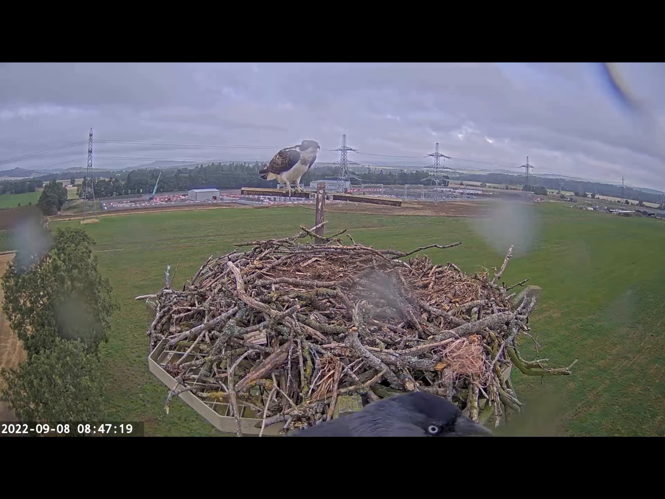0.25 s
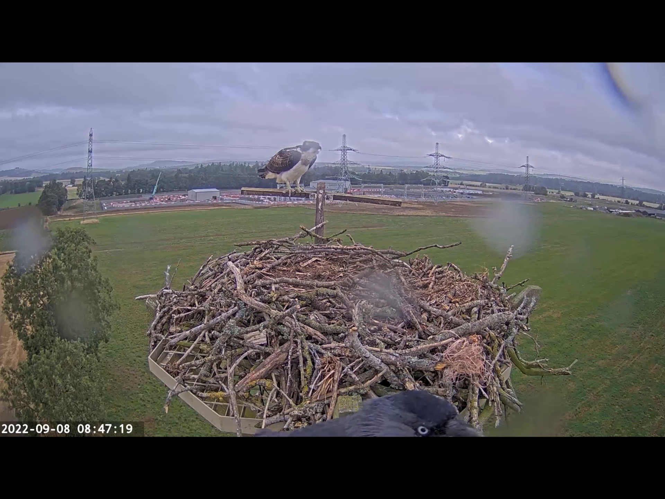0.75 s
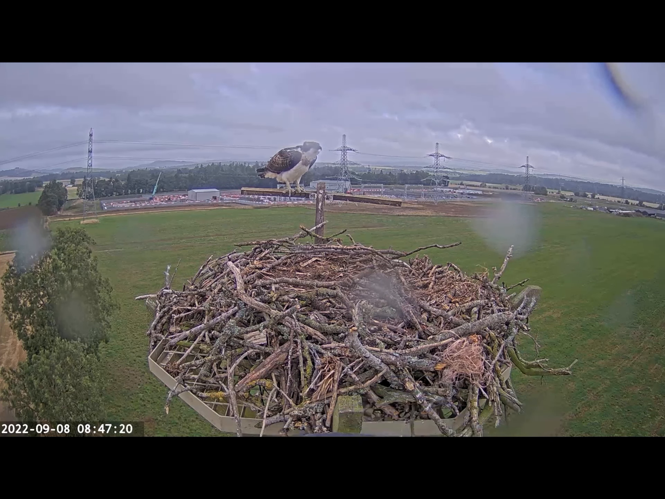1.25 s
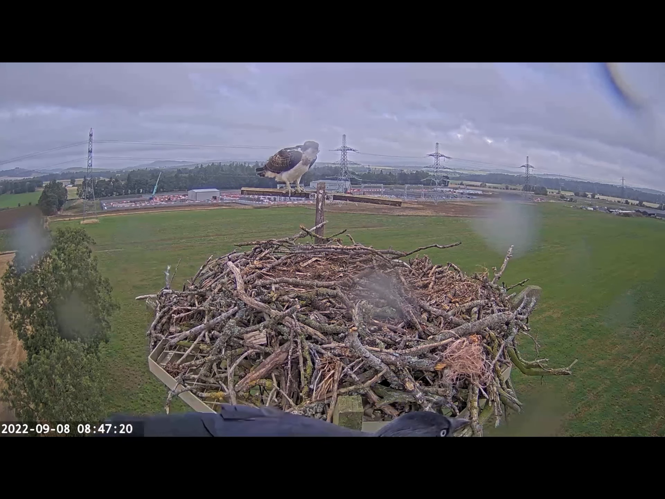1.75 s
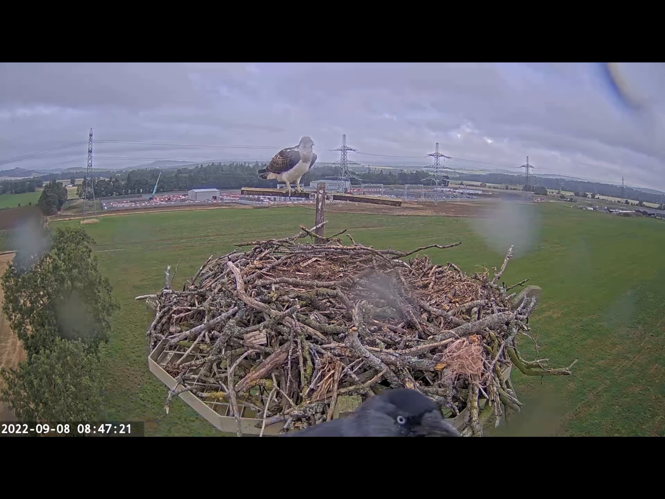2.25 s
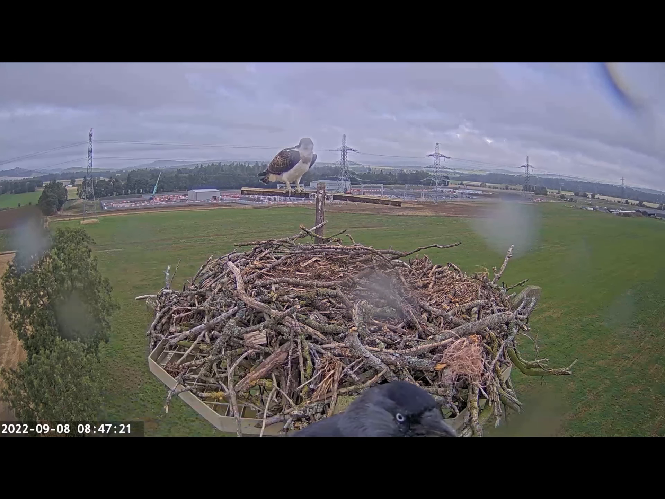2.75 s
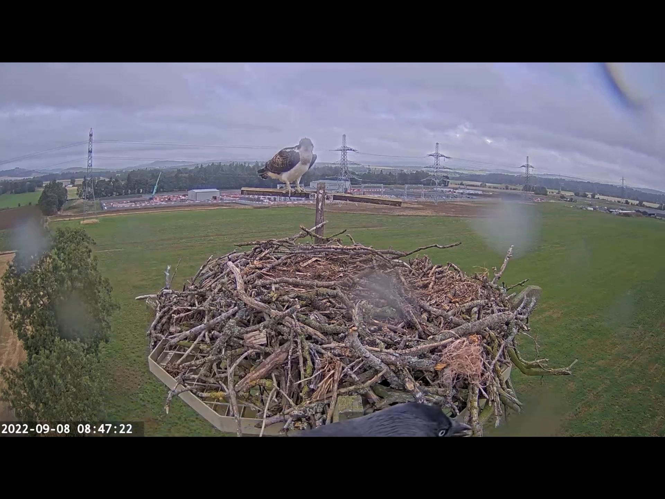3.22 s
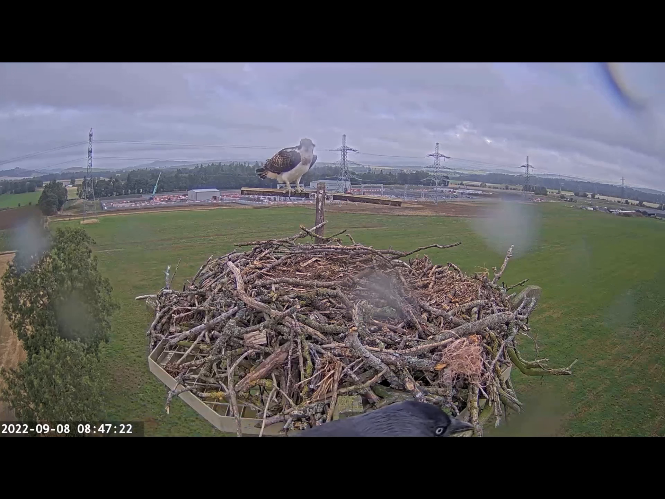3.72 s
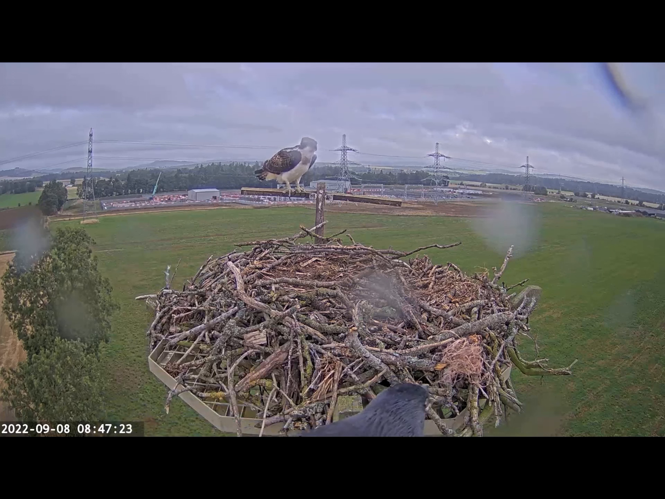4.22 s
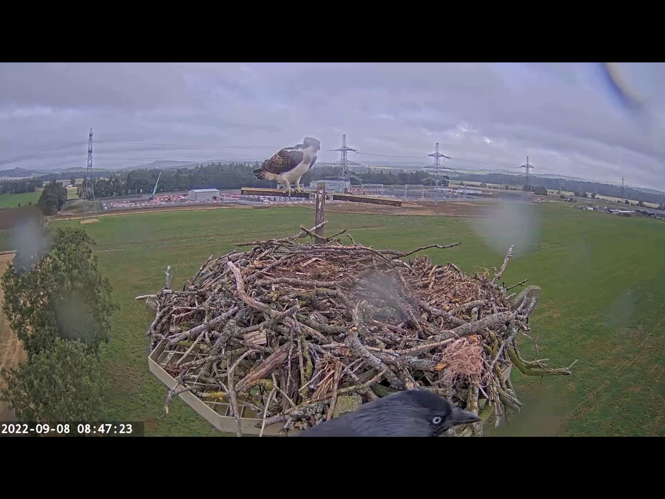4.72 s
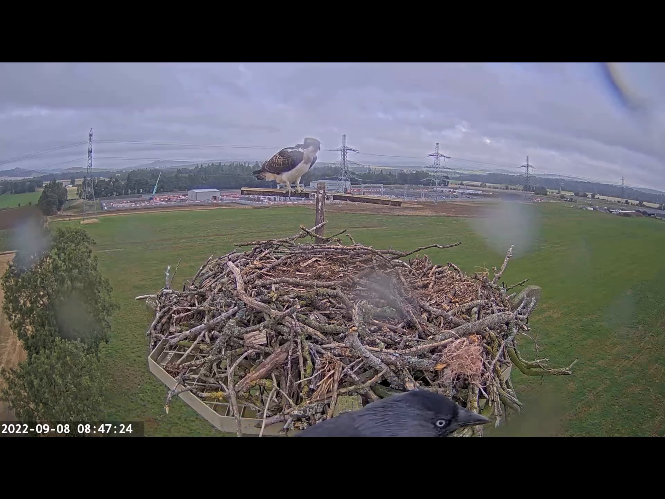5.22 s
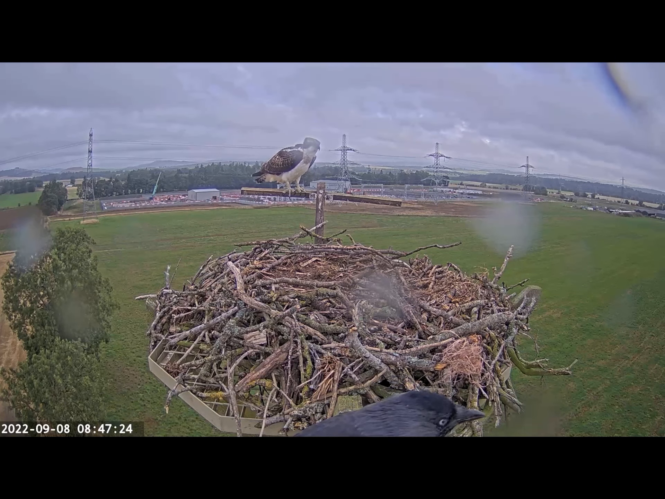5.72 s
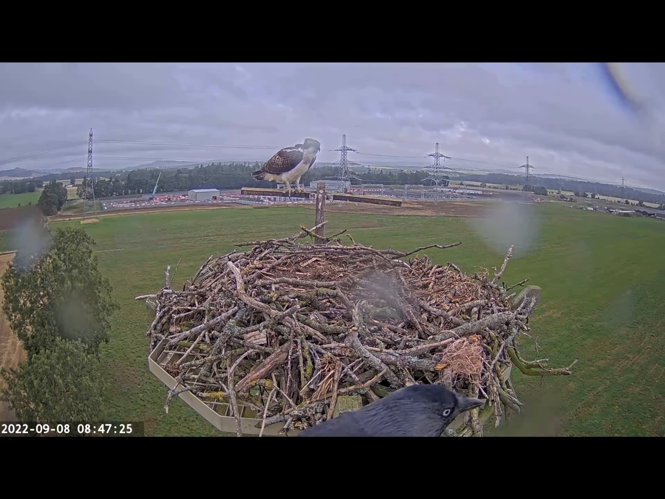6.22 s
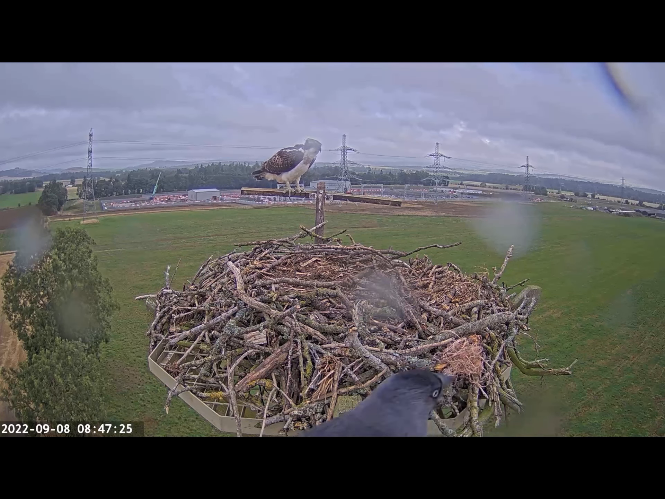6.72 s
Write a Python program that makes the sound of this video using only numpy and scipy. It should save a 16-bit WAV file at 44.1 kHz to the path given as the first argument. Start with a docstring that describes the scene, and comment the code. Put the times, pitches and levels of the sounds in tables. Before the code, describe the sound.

Wind pushes on a microphone at an exposed stick nest for about seven seconds: deep uneven buffeting, low rumble and a soft, slightly hollow rushing hiss. In the first 0.7 seconds faint claw clicks and dull knocks tick on the sticks. At about 0.95 a jackdaw very close by gives a sharp, bright, falling chack, followed at 1.1 by a softer, nasal, clipped kya. Two faint knocks come around 1.3. At 1.7 there is one quick wingbeat, a short airy swish with a tiny whip and a trailing feather rustle. A second double call comes at 3.1 and 3.25 as a gust swells. From 3.8 to 6.5 small claw ticks scatter irregularly over wood. The third chack, brightest and harshest, lands at 6.67, then a faint thin squeak at 6.8 and a quiet final kya at 6.9. Each note has only a brief scattered tail.

```python
"""A jackdaw on a high platform gives three double calls: a sharp "tchak", then a soft "kya"; one squeak is added.
Each note is a harmonic stack through throat and beak, with breath noise and usually a second voice.
It flaps up once (swept noise, feather hiss, a whip) and its claws tick on sticks (decaying noise bursts).
Wind, as shaped noise, buffets the microphone of a nest camera, rumbles, and hisses in the housing."""
import sys
import numpy as np
from scipy import signal
from scipy.fft import rfft, irfft
from scipy.io import wavfile
from scipy.ndimage import uniform_filter1d

SR = 44100
rng = np.random.default_rng(int(sys.argv[2]) if len(sys.argv) > 2 else 0)


def put_to_file(sound):
    """Save the sound as 16-bit audio at rate SR, in the file named by the first command-line argument."""
    columns = np.atleast_2d(sound).T  # one column per channel
    safe = np.clip(columns, -1, 1)
    whole_steps = np.round(safe * 32767)
    wavfile.write(sys.argv[1], SR, whole_steps.astype(np.int16))


N = 307136
T = np.arange(N) / SR

# sharp first notes: (time [s], length before release [s], pitch [Hz], final pitch [Hz], glide [s], body [dB],
# edge [dB], edge attack [s], time to the break [s], second voice [Hz], second voice [dB],
# edge tilt [dB/octave], lower beak gap [Hz], upper beak gap [Hz])
TCHAKS = [(0.955, 0.057, 1082, 852, 0.039, -19, -33.5, 0.011, 0.046, 1996, -29, -5.5, 3320, 8500),
          (3.098, 0.054, 1151, 824, 0.035, -20, -31, 0.0094, 0.038, 2320, -37, -5, 2750, 8000),
          (6.666, 0.059, 1208, 780, .040, -19.5, -26, 0.0074, 0.054, 2334, -33, -1.5, 4150, 8630)]
# soft second notes: (time [s], length before release [s], pitch [Hz], scoop [s], hold [s], opening push [dB],
# sag [dB/s], body [dB], edge [dB], edge tilt [dB/octave], lift of the fundamental [dB],
# extra throat ring [dB], second voice in the hold [Hz], [dB], second voice at the end [Hz], [dB])
KYAS = [(1.0864, 0.047, 773.4, 0.0044, .035, -0.5, 134, -24.5, -50, 2, 3, 6, 2250, -39, 2304, -34.5),
        (3.2553, 0.044, 843.5, 0.017, 0.034, -2.5, 56, -30.5, -51.5, 0.5, 0.5, -4, 2623, -47, 2247, -29.5),
        (6.896, 0.023, 774, 0.0038, 0.018, 3.5, 73, -32.5, -55.5, -2, 6, 3.5, 2197, -48, 2020, -37)]
# throat response, beak wide open: (frequency [Hz], gain [dB])
OPEN_THROAT = [(600, -2.5), (950, -0.5), (1150, 1), (1500, -12), (1950, 1.5), (2200, 5.5), (2400, 3),
               (2900, -21), (3450, -16), (4200, -14.5), (5200, -15.5), (6100, -20.5), (6900, -15),
               (7700, -18.5), (9200, -28.5)]
# throat response, beak half closed: (frequency [Hz], gain [dB])
NARROW_THROAT = [(550, -9.5), (800, -6.5), (1200, -8), (1600, -5.5), (1950, -8), (2320, 2), (2530, -7.5),
                 (3050, -22), (3400, -28.5), (3800, -32.5), (4400, -48), (5300, -30), (6200, -43.5),
                 (6900, -26), (7600, -38), (8300, -51)]
# beak gap of the squeak: (frequency [Hz], width [Hz])
SQUEAK_GAPS = [(4550, 1300)]
# wingbeat, then settling feathers: (time [s], level [dB], treble relative to sweep [dB])
WING = [(1.712, -85, 0), (1.720, -66, -4), (1.727, -54, -7), (1.743, -51, -10), (1.752, -64, 3),
        (1.768, -66, 11), (1.782, -68, 10), (1.793, -65, 15), (1.803, -74, 10), (1.845, -73, 8),
        (1.857, -71, 9), (1.868, -68, 2), (1.895, -82, 4)]
# hiss of the feather groups: (frequency [Hz], width [Hz], relative level [dB])
FEATHERS = [(4300, 1200, -9), (5700, 1400, -1), (7000, 1400, 0.5), (8300, 2200, -2)]
# claws on the sticks: (time [s], click [dB], knock [dB])
CLAWS = [(0.028, -62, -53), (0.166, -76, -49), (0.314, -76, -54), (0.401, -72, -51), (0.434, -74, -61),
         (0.477, -74, -54), (0.630, -70, -57), (0.693, -74, -60), (1.259, -82, -56), (1.338, -74, -55),
         (3.828, -67, -59), (3.93, -70, -51.5), (4.158, -61, -51.5), (4.282, -64.5, -54), (4.303, -71, -52),
         (4.731, -63, -51.5), (4.751, -71, -55), (4.911, -63, -53), (5.371, -72, -58), (5.783, -67, -53.5),
         (5.856, -70, -51), (5.877, -68, -56), (5.927, -70, -53), (6.035, -67.5, -55), (6.087, -67, -56),
         (6.196, -78, -53), (6.498, -80, -58)]
# stick resonances: (frequency [Hz], width [Hz], relative gain [dB])
STICK = [(1150, 600, 3), (2120, 490, -1), (2840, 350, -4.5), (3370, 370, -11.5)]
# wind strength: (time [s], buffeting above 20 Hz [dB], rumble [dB], rush [dB])
WIND = [(0.0, -28, -35, -38), (0.27, -27, -34.5, -39.5), (0.36, -27.5, -33.5, -42),
        (0.44, -27.5, -38, -37.5), (0.6, -36, -37, -41), (0.93, -27, -39, -44.5), (1.15, -38.5, -42, -40.5),
        (1.45, -27, -35, -39.5), (1.58, -32.5, -38.5, -41), (1.9, -34.5, -45.5, -42), (2.12, -34, -42, -49),
        (2.27, -36.5, -37.5, -46.5), (2.5, -32, -36, -43), (2.78, -31, -33, -41), (2.92, -31, -34, -46.5),
        (3.08, -36.5, -38, -46), (3.27, -26, -33.5, -42.5), (3.5, -27, -32.5, -40), (3.68, -30, -35, -41),
        (4.05, -34, -33, -39), (5.0, -32, -34, -41), (6.3, -33, -37, -41.5), (6.46, -36, -39.5, -43.5),
        (6.56, -31.5, -39, -40.5), (6.96, -35, -36.5, -45)]
# buffeting spectrum: (frequency [Hz], relative density [dB per Hz])
BUFFET = [(4, 5), (10, 11), (18, 7), (30, -2), (48, -4), (70, -27.5), (300, -100)]
# rumble spectrum: (frequency [Hz], relative density [dB per Hz])
RUMBLE = [(10, -25), (40, -7), (58, 1), (80, -1.5), (115, -8), (170, -18), (300, -41), (900, -91)]
# rush spectrum: (frequency [Hz], relative density [dB per Hz])
RUSH = [(70, 0), (160, 1.5), (250, -2), (400, -7), (700, -14), (1050, -16), (1350, -23.5), (1600, -31.5),
        (2100, -33.5), (2550, -39), (4500, -65), (9500, -65.5)]
# air resonances of the housing: (frequency [Hz], width [Hz], relative peak density [dB per Hz])
HOUSING = [(2087, 554, -2.5), (2750, 240, -7.5), (3230, 450, -21), (3556, 260, -15.5), (4170, 300, -16),
           (5150, 500, -19.5), (6120, 560, -23.5), (7220, 1500, -28.5)]
# narrow quiet bands in the wind hiss: (frequency [Hz], width [Hz])
WIND_HISS_GAPS = [(2530, 170), (3880, 240), (4580, 340), (5500, 100)]
# resonances of the port before the microphone: (frequency [Hz], width [Hz], gain [dB])
PORT = [(3180, 320, -11), (3620, 230, -0.5), (3990, 360, -3.5), (4400, 200, -6.5), (5240, 340, 2),
        (5980, 430, 1), (6830, 320, 0), (7560, 600, -2.5), (8820, 530, -6)]
# bands where the port's paths cancel: (frequency [Hz], width [Hz])
PORT_GAPS = [(4720, 91), (6320, 180)]

# all notes
EDGE_HZ, TOP_HZ = 2800, 9500
EDGE_BREATH_POWER = (.012, .2)  # breath share of the edge: clear, full rasp
SECOND_JITTER_RATIO = 3  # pitch spread of the second voice over the note's jitter setting
EDGE_WET_DB = -4.5  # the sticks return much of the treble
RING_OUT_S = 0.022

# tchak; jitter is a pitch share, later scaled by 0.33 + rasp
TCHAK_SWELL_DB, TCHAK_SLACK_DB = 4, -12.5
TCHAK_SLACK_S, TCHAK_SLACKEN_S = 0.028, 0.026  # start and duration of the slackening
TCHAK_BREAKING_S, TCHAK_SECOND_S = 0.009, 0.0091
TCHAK_RASP = (.14, .55)  # before, after the break
TCHAK_DULL_DB_PER_OCT, TCHAK_BRIGHTEN_S = -7.5, 0.024
TCHAK_JITTER, TCHAK_UNEVEN_DB = .008, 4.5
EDGE_LEAD_S = 0.0089  # the edge releases this long before the body
BEAK_GAP_WIDTH_HZ = 710

# kya
KYA_RASP = (.5, .18, .45)  # start, hold, end
KYA_CLEAR_S, KYA_BREAKING_S, KYA_PUSH_S = 0.015, 0.0092, 0.013
KYA_SCOOP_HZ, KYA_FALL_HZ_PER_S = 70.5, 10000
KYA_RING_HZ, KYA_RING_WIDTH_HZ = 2320, 340
KYA_LOW_HZ = 1000  # the fundamental lies below
KYA_JITTER, KYA_UNEVEN_DB = .004, 2.5

# squeak before the last kya
SQUEAK_S, SQUEAK_LENGTH_S, SQUEAK_HZ, SQUEAK_FALL_HZ_PER_S = 6.809, 0.072, 1160, 2500
SQUEAK_BODY_DB, SQUEAK_EDGE_DB = -58, -61.5

# wing
FEATHER_SLIP_DB = 4
WHIP_S, WHIP_LENGTH_S, WHIP_HZ, WHIP_WIDTH_HZ, WHIP_DB = 1.739, .007, 5900, 500, -58


def jackdaw():
    """All notes: open-beaked ones are harsh, half-closed ones purer and more nasal."""
    out = np.zeros(N)
    for start_s, *note in TCHAKS:
        add(out, start_s, tchak(*note))
    for start_s, *note in KYAS:
        add(out, start_s, kya(*note))
    add(out, SQUEAK_S, squeak())
    return out


def tchak(length_s, pitch_hz, end_hz, glide_s, body_db, edge_db, edge_attack_s, break_s,
          second_hz, second_db, tilt_db, low_gap_hz, high_gap_hz):
    """Open beak: swells and brightens, slides down and sinks into rasp as the syrinx slackens."""
    t = np.arange(0, length_s + RING_OUT_S, 1 / SR)
    hz = end_hz + (pitch_hz - end_hz) * np.exp(-(t / glide_s) ** 2)
    effort_db = TCHAK_SWELL_DB * (ramp(t, 0, TCHAK_SLACK_S) - 1)
    effort_db += TCHAK_SLACK_DB * ramp(t, TCHAK_SLACK_S, TCHAK_SLACKEN_S)
    body = body_db + effort_db + envelope(
        t, length_s, attack_s=0.0059, sag_db_per_s=8.5, release_db_per_s=797.5)
    edge = edge_db + envelope(
        t, length_s - EDGE_LEAD_S, attack_s=edge_attack_s, sag_db_per_s=139.5, release_db_per_s=1606.5)
    # the second voice sounds briefly from the break
    second = second_db + envelope(
        t - break_s, TCHAK_SECOND_S, attack_s=0.0067, sag_db_per_s=298.5, release_db_per_s=900)
    broken = ramp(t, break_s - TCHAK_BREAKING_S, TCHAK_BREAKING_S)
    rasp = np.interp(broken, (0, 1), TCHAK_RASP)
    # brightens as the beak opens
    tilt = tilt_db + TCHAK_DULL_DB_PER_OCT * (1 - ramp(t, 0, TCHAK_BRIGHTEN_S))
    # the gaps depend on how the head is turned
    gaps = [(low_gap_hz, BEAK_GAP_WIDTH_HZ), (high_gap_hz, BEAK_GAP_WIDTH_HZ)]
    return call(hz, body, edge, rasp, OPEN_THROAT, tilt, gaps, second_hz, second,
                jitter=TCHAK_JITTER, uneven_db=TCHAK_UNEVEN_DB, shimmer=0.42, air=0.47)


def kya(length_s, pitch_hz, scoop_s, hold_s, push_db, sag_db_per_s, body_db, edge_db, tilt_db,
        low_db, ring_db, held_hz, held_db, end_hz, end_db):
    """Half-closed beak: starts hoarse, scoops up, holds clear, drops; second voice near the third partial."""
    t = np.arange(0, length_s + RING_OUT_S, 1 / SR)
    scoop_hz = KYA_SCOOP_HZ * (1 - ramp(t, 0, scoop_s))
    hz = pitch_hz - scoop_hz - KYA_FALL_HZ_PER_S * np.maximum(t - hold_s, 0)
    opening_db = push_db * (1 - ramp(t, 0, KYA_PUSH_S) ** 2)
    body = body_db + opening_db + envelope(
        t, length_s, attack_s=0.0035, sag_db_per_s=sag_db_per_s, release_db_per_s=1100.5)
    edge = edge_db + envelope(t, length_s, attack_s=.0025, sag_db_per_s=197, release_db_per_s=905.0)
    broken = ramp(t, hold_s, KYA_BREAKING_S)
    rasp = np.interp(ramp(t, 0, KYA_CLEAR_S) + broken, (0, 1, 2), KYA_RASP)
    second_hz = held_hz + (end_hz - held_hz) * broken
    second = held_db + (end_db - held_db) * broken + envelope(
        t, length_s, attack_s=0.003, sag_db_per_s=-4.5, release_db_per_s=1213)
    throat = [(f, db + low_db * (f < KYA_LOW_HZ) + ring_db * peak(f, KYA_RING_HZ, KYA_RING_WIDTH_HZ))
              for f, db in NARROW_THROAT]
    return call(hz, body, edge, rasp, throat, tilt_db, [], second_hz, second,
                jitter=KYA_JITTER, uneven_db=KYA_UNEVEN_DB, shimmer=0.42, air=0.14)


def squeak():
    """Faint thin note, one voice only, that sinks in pitch and soon frays."""
    t = np.arange(0, SQUEAK_LENGTH_S + RING_OUT_S, 1 / SR)
    fade_db = envelope(t, SQUEAK_LENGTH_S, attack_s=0.0069, sag_db_per_s=130, release_db_per_s=450)
    rasp = .6 * ramp(t, start_s=.018, rise_s=.03)
    hz = SQUEAK_HZ - SQUEAK_FALL_HZ_PER_S * t
    return call(hz, SQUEAK_BODY_DB + fade_db, SQUEAK_EDGE_DB + fade_db, rasp, OPEN_THROAT, -1,
                SQUEAK_GAPS, second_hz=0, second_db=-np.inf, jitter=.011)


def call(hz, body_db, edge_db, rasp, throat, tilt_db, gaps, second_hz, second_db,
         jitter=.02, uneven_db=8.0, shimmer=0.5, air=0.2):
    """One note: harmonics through throat and beak; rasp adds breath, pitch tremble and level flutter."""
    n = len(hz)
    hz, rasp = np.maximum(hz, 1), np.clip(rasp, 0, 1)
    trembling_hz = hz * (1 + jitter * (0.33 + rasp) * wander(400, size=n))
    phase = 2 * np.pi * np.cumsum(trembling_hz) / SR
    k = np.arange(1, 15)[:, None]
    partial_hz = k * hz
    # each partial swells and sinks on its own, most in the edge
    unevenness = np.minimum(0.6 * rasp + (partial_hz > EDGE_HZ), 1)
    swell_db = uneven_db * np.array([wander(85, size=n) for _ in k]) * unevenness
    gain = response(throat, partial_hz) * (partial_hz < TOP_HZ) * undb(swell_db)
    partials = gain * np.sin(k * phase)
    # low partials form the body, high ones the edge
    high = np.clip((partial_hz - EDGE_HZ) / 400 + .5, 0, 1)
    body = np.sum(partials * (1 - high), axis=0)
    body = body / np.std(body[:SR // 50])
    tilt = undb(tilt_db * np.log2(partial_hz / EDGE_HZ))
    edge = steady(np.sum(partials * high * tilt, axis=0))
    # air escapes once a cycle
    puff = 1 + 0.4 * np.cos(phase)
    low_air = puff * noise(lambda f: response(throat, f) * (f > 600) * (f < EDGE_HZ), size=n)
    high_air = puff * noise(lambda f: response(throat, f) * (f > EDGE_HZ), size=n)
    # the other side of the syrinx, an unsteady tone
    unsteady_hz = second_hz * (1 + SECOND_JITTER_RATIO * jitter * wander(200, size=n))
    second = np.sqrt(2) * np.sin(2 * np.pi * np.cumsum(unsteady_hz) / SR)
    body = (body + rasp * air * low_air) * undb(body_db) + second * undb(second_db)
    share = np.interp(rasp ** 2, (0, 1), EDGE_BREATH_POWER)
    breathy_edge = np.sqrt(1 - share) * edge + np.sqrt(share) * high_air
    edge = steady(notch(port(breathy_edge), gaps))
    flutter = (1 + shimmer * rasp * wander(450, size=n)) * signal.windows.tukey(n, .04)
    body_sound = scatter(body * flutter, wet_db=-14.5, t60=0.047)
    edge_sound = scatter(edge * undb(edge_db) * flutter, wet_db=EDGE_WET_DB, t60=0.044)
    return body_sound + edge_sound


def wing():
    """Air swept by the downstroke, a wing-tip whip, and the uneven hiss of sliding feathers."""
    level_db, treble_db = curves(WING, T)
    sweep = noise(lambda f: peak(f, 2450, 700) + 0.3 * peak(f, 3100, 1600) + 0.72 * peak(f, 990, 700))
    sweep = sweep * undb(FEATHER_SLIP_DB / 2 * wander(120))
    # feather groups catch and slip, each with its own hiss
    groups = sum(noise(lambda f: peak(f, hz, width)) * undb(db + FEATHER_SLIP_DB * wander(90))
                 for hz, width, db in FEATHERS)
    feathers = unit(port(groups))
    mix = (sweep + undb(treble_db) * feathers) / np.sqrt(1 + undb(2 * treble_db))
    barbs_db = 2.5 * wander(600)
    whip = steady(noise(lambda f: peak(f, WHIP_HZ, WHIP_WIDTH_HZ)))
    whip = whip * undb(WHIP_DB) * np.exp(-((T - WHIP_S) / WHIP_LENGTH_S) ** 2)
    active = (T > WING[0][0]) * (T < WING[-1][0])
    return mix * undb(level_db + barbs_db) * active + whip


def claws(click_t60=0.035, knock_t60=0.062):
    """Soft contacts on wood: a claw click and a duller stick knock, both decaying noise."""
    out, t = np.zeros(N), T[:SR // 10]
    for start_s, click_db, knock_db in CLAWS:
        click = noise(lambda f: peak(f, 5400, 3500), size=len(t))
        click = click * undb(click_db - 60 * t / click_t60)
        knock = noise(lambda f: sum(undb(db) * peak(f, hz, width) for hz, width, db in STICK), size=len(t))
        knock = knock * undb(knock_db - 60 * t / knock_t60)
        add(out, start_s, (click + knock) * ramp(t, 0, rise_s=0.0016))
    return out


def wind():
    """Eddies push on the microphone; faster ones rush over the housing and sound its cavities."""
    buffet_db, rumble_db, rush_db = curves(WIND, T)
    eddies = noise(lambda f: response(BUFFET, f))
    # the gust curve sets the level above 20 Hz
    audible = signal.sosfiltfilt(signal.butter(2, 20, "high", fs=SR, output="sos"), eddies)
    buffet = eddies / np.sqrt(uniform_filter1d(audible ** 2, size=SR // 6)) * undb(buffet_db)
    rumble = steady(noise(lambda f: response(RUMBLE, f)), size=SR // 7) * undb(rumble_db)
    # small eddies make the rush surge, with brief puffs
    puffs_db = 3 * np.maximum(wander(30) - 1, 0)
    gust_db = rush_db + 0.57 * wander(25) + puffs_db
    # each octave also flutters alone
    flow, f = rfft(noise(lambda f: response(RUSH, f))), np.fft.rfftfreq(N, 1 / SR)
    octave = np.clip(np.log2(f / 100 + 1e-9), 0, 6)
    bands = (irfft(flow * np.maximum(1 - abs(octave - k), 0), N) for k in range(7))
    flutter_db = 2.2
    rush = sum(band * undb(flutter_db * wander(20)) for band in bands) * undb(gust_db)
    # each cavity is blown by its own eddies
    cavities = unit(sum(
        undb(db + 2 * wander(30)) * np.sqrt(width) * noise(lambda f: peak(f, hz, width))
        for hz, width, db in HOUSING))
    hiss = notch(rush + cavities * undb(gust_db - 24.0), WIND_HISS_GAPS)
    return buffet + rumble + hiss


def microphone_hiss():
    """Faint white noise plus fainter noise coloured by the port."""
    white = undb(-80.5) * rng.standard_normal(N)
    return white + undb(-90.0) * unit(port(rng.standard_normal(N)))


def port(x):
    """The port rings at its resonances and leaves deep gaps between them."""
    rings = sum(undb(db) * signal.lfilter(*signal.iirpeak(hz, hz / width, fs=SR), x)
                for hz, width, db in PORT)
    return notch(rings, PORT_GAPS)


def scatter(x, wet_db, t60):
    """Direct sound plus a brief wash of reflections from platform and sticks."""
    t = T[:SR // 6]
    decay = undb(-60 * t / t60) + undb(-39.5) * undb(-60 * t / 0.11)
    tail = rng.standard_normal(len(t)) * decay * (t > .002)
    tail = tail / np.linalg.norm(tail) * undb(wet_db)
    return signal.fftconvolve(x, tail + (t == 0)) / np.sqrt(1 + undb(2 * wet_db))


def envelope(t, length_s, attack_s, sag_db_per_s, release_db_per_s):
    """Level in dB: quick attack, sagging hold, then a steeper fall after length_s."""
    attack_db = 20 * np.log10(ramp(t, 0, attack_s) ** 2.0 + 1e-3)
    sag_db = sag_db_per_s * np.maximum(t - attack_s, 0)
    return attack_db - sag_db - release_db_per_s * np.maximum(t - length_s, 0)


def ramp(t, start_s, rise_s):
    """Straight rise from 0 to 1."""
    return np.clip((t - start_s) / rise_s, 0, 1)


def notch(x, gaps):
    """Cancel each (Hz, width Hz) band."""
    for hz, width in gaps:
        x = signal.lfilter(*signal.iirnotch(hz, hz / width, fs=SR), x)
    return x


def steady(x, size=500):
    """Hold the short-term rms at 1; size in samples."""
    return x / np.sqrt(uniform_filter1d(x ** 2, size=size) + 1e-12)


def undb(db):
    """Decibels to gain."""
    return 10 ** (np.asarray(db) / 20)


def unit(x):
    """Scale to rms 1."""
    return x / np.sqrt(np.mean(x ** 2) + 1e-18)


def curves(rows, t):
    """Table columns joined by straight lines in time."""
    s, *columns = np.transpose(rows)
    return [np.interp(t, s, c) for c in columns]


def response(points, hz):
    """Gain of a (Hz, dB) spectrum, interpolated over log frequency."""
    f, db = np.transpose(points)
    return undb(np.interp(np.log(hz + 1e-9), np.log(f), db))


def noise(shape, size=N):
    """Noise of rms 1 whose spectrum follows shape(Hz)."""
    spectrum = rfft(rng.standard_normal(size)) * shape(np.fft.rfftfreq(size, 1 / SR))
    return unit(irfft(spectrum, size))


def peak(f, hz, width):
    """Gain of a resonance, halved at width / 2 from its centre."""
    return 1 / (1 + ((f - hz) / width * 2) ** 2)


def wander(rate, size=N):
    """Smooth random curve of rms 1, changing up to about rate times a second."""
    return noise(lambda f: peak(f, 0, 2 * rate), size=size)


def add(out, start_s, x):
    """Mix in a short sound."""
    i = int(start_s * SR)
    out[i:i + len(x)] += x[:N - i]


def scene():
    """Bird and wind over microphone hiss, with short end fades."""
    mix = jackdaw() + wing() + claws() + wind() + microphone_hiss()
    return (mix * signal.windows.tukey(N, .002))[None]


def record(dry):
    """The camera cuts the top off steeply."""
    return signal.sosfilt(signal.ellip(10, .2, 80, TOP_HZ, fs=SR, output="sos"), dry)


dry = scene()
out = record(dry)
put_to_file(out)
```